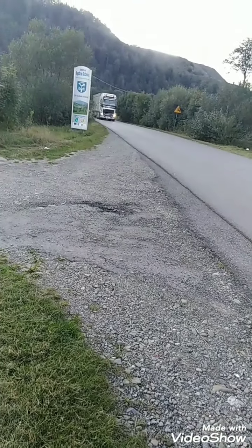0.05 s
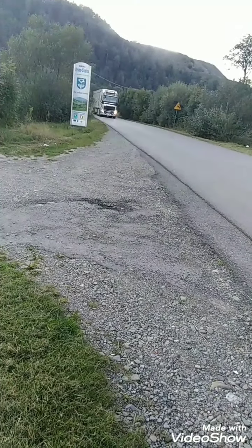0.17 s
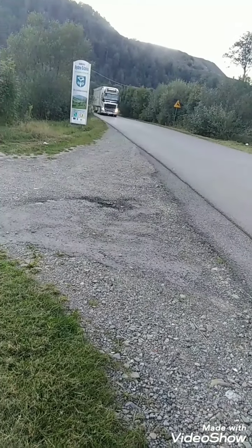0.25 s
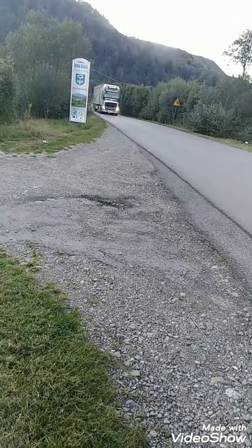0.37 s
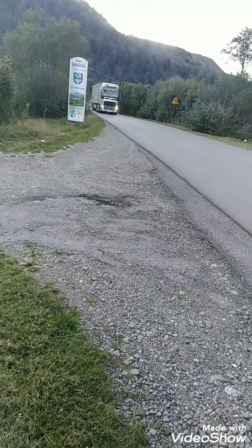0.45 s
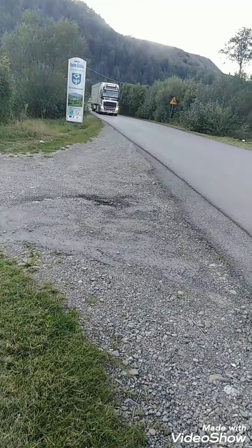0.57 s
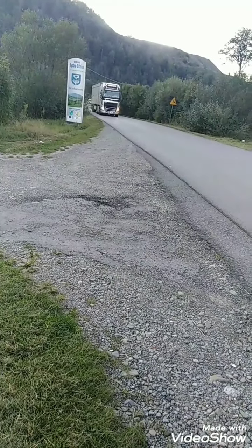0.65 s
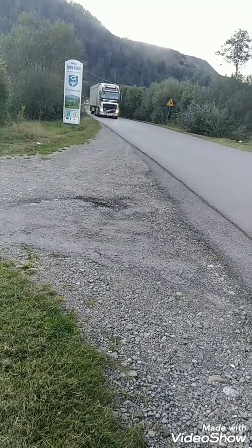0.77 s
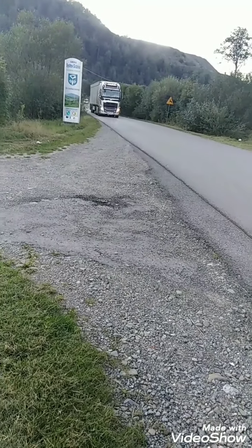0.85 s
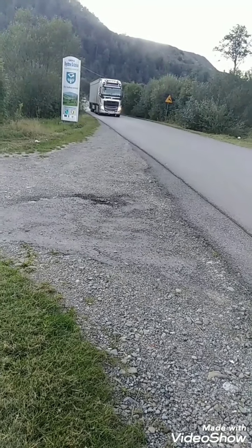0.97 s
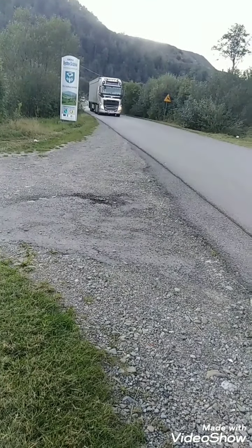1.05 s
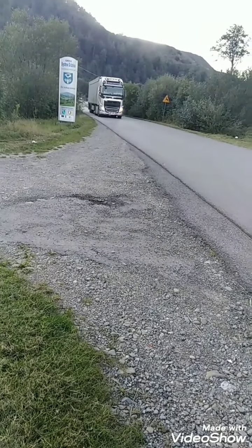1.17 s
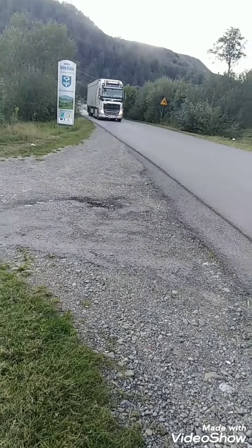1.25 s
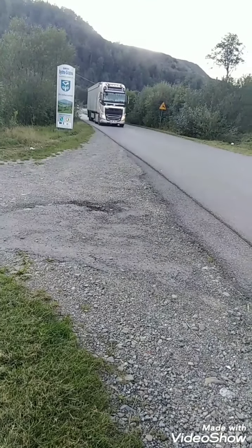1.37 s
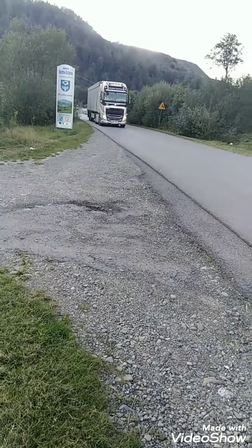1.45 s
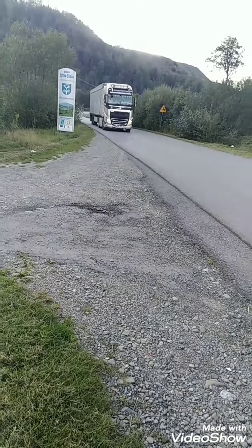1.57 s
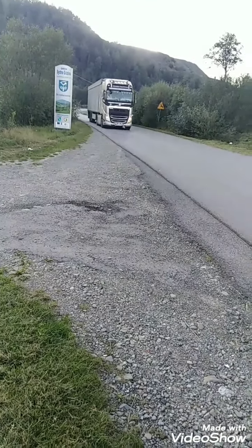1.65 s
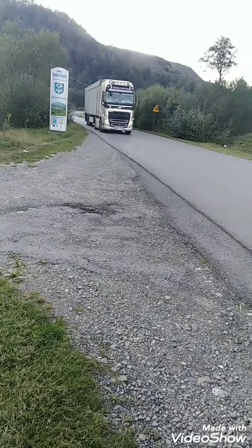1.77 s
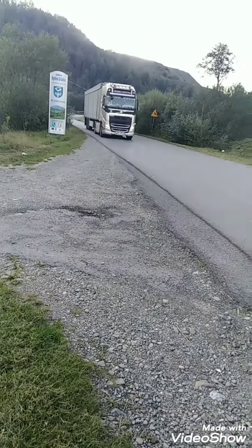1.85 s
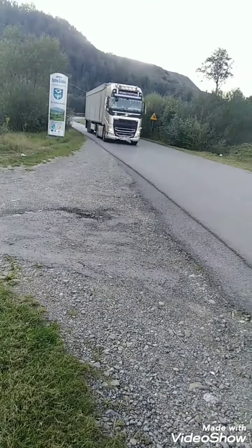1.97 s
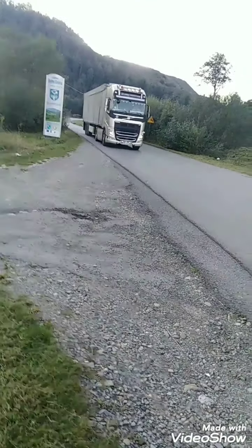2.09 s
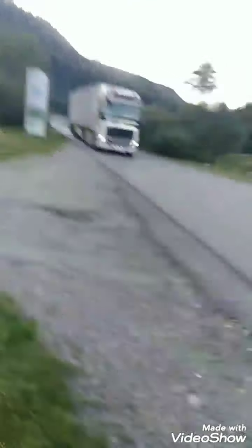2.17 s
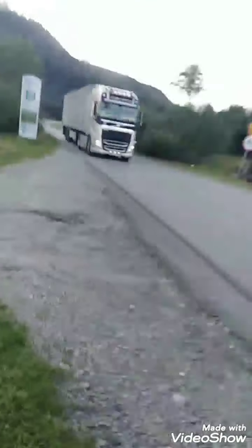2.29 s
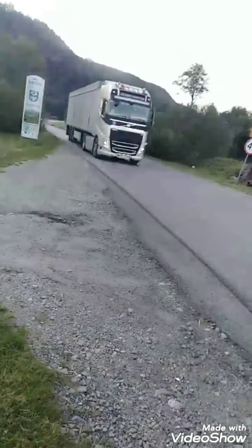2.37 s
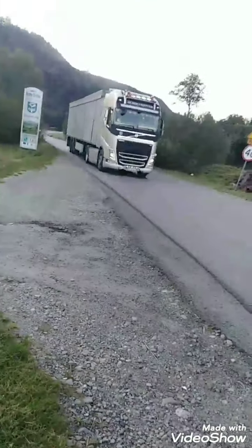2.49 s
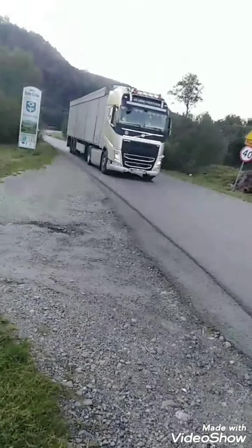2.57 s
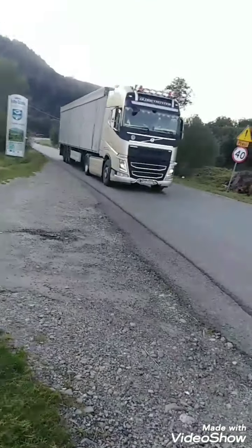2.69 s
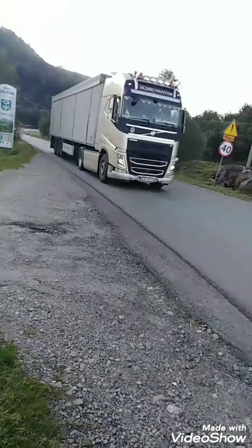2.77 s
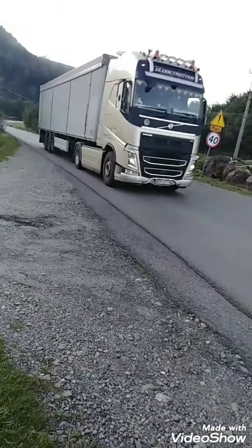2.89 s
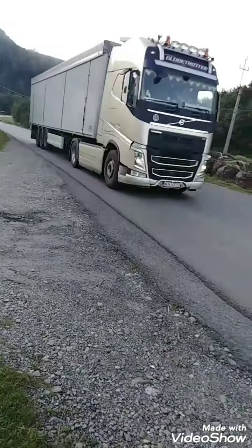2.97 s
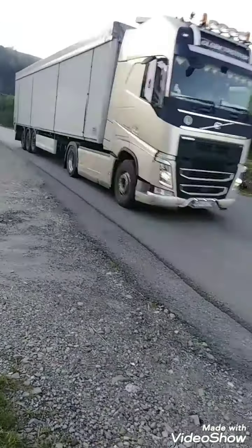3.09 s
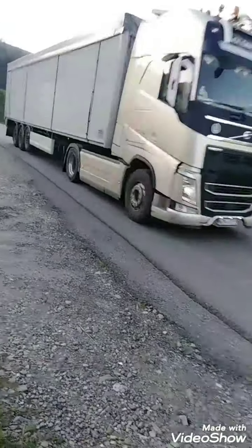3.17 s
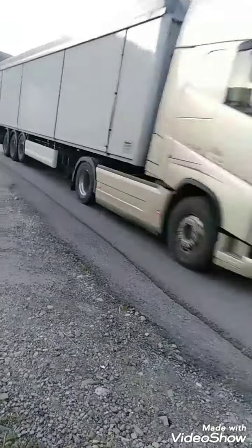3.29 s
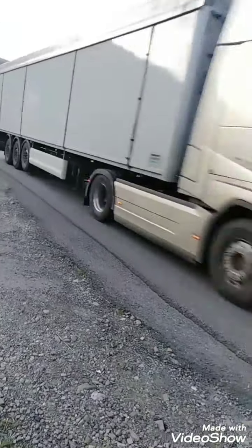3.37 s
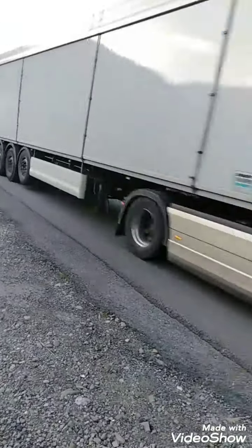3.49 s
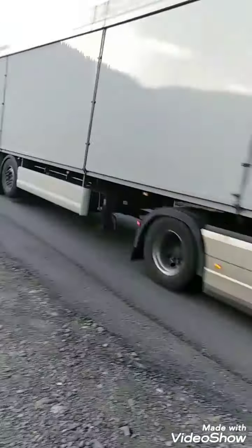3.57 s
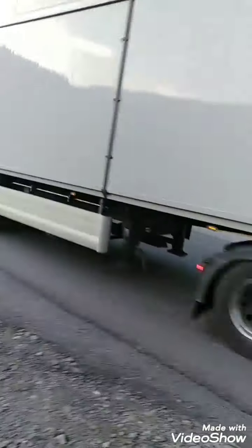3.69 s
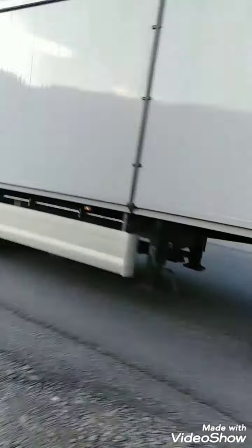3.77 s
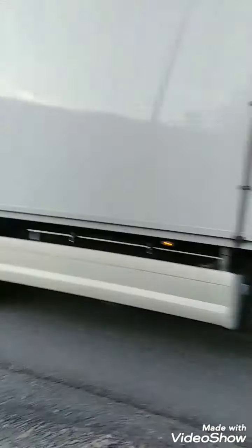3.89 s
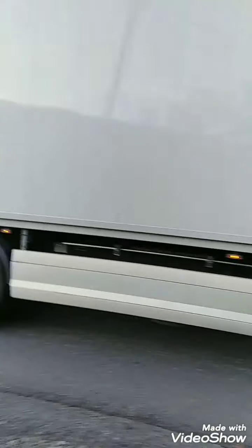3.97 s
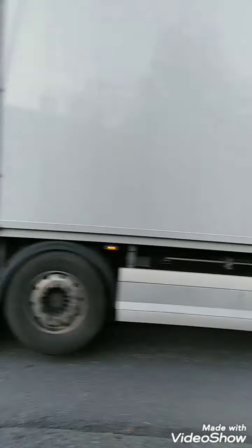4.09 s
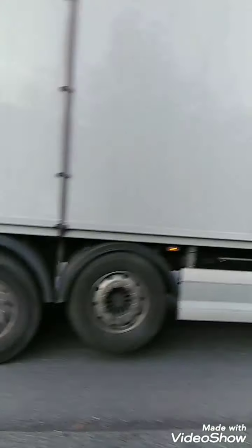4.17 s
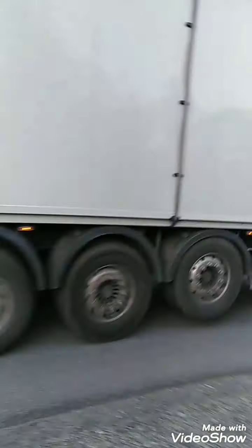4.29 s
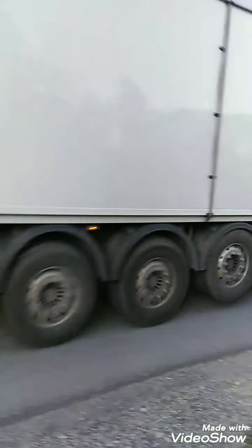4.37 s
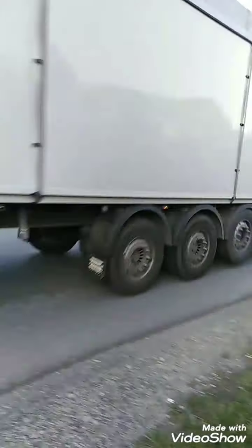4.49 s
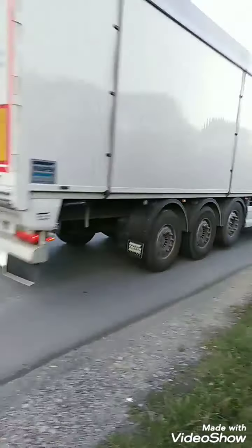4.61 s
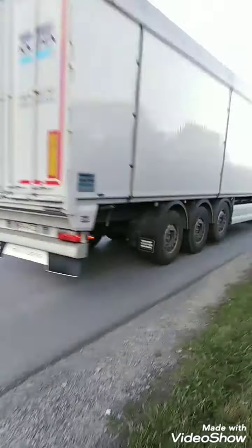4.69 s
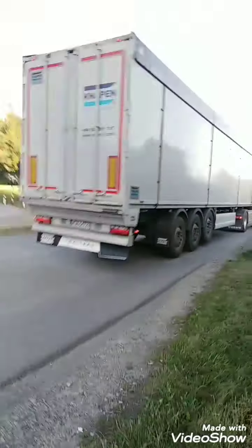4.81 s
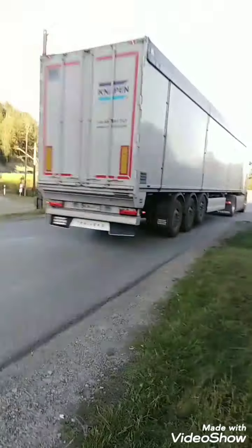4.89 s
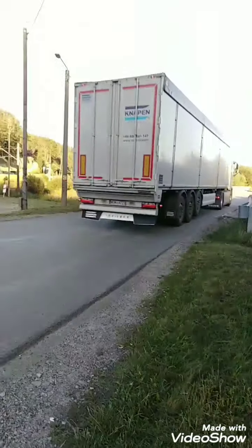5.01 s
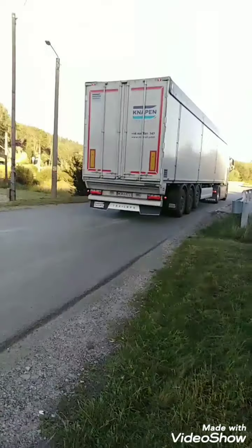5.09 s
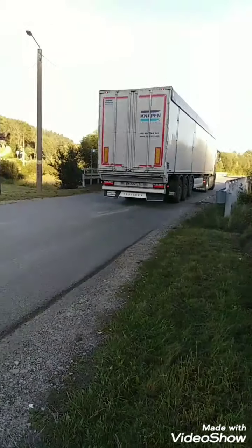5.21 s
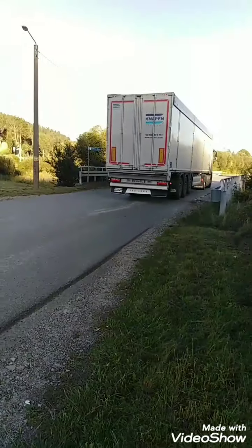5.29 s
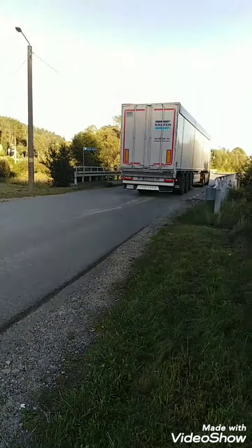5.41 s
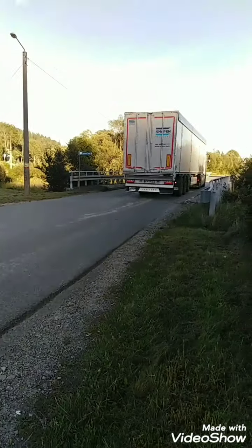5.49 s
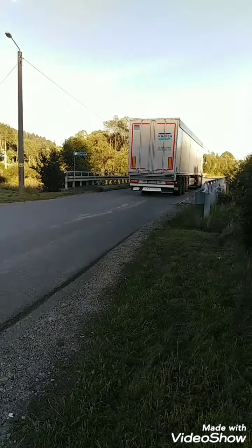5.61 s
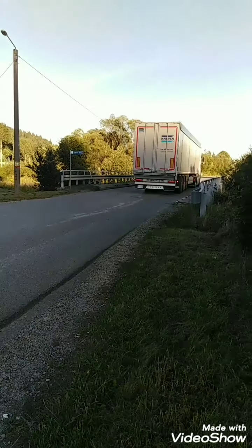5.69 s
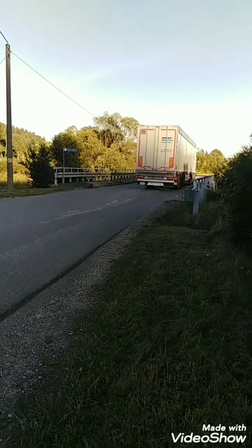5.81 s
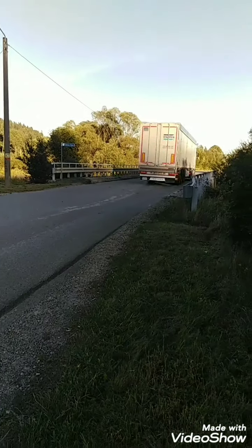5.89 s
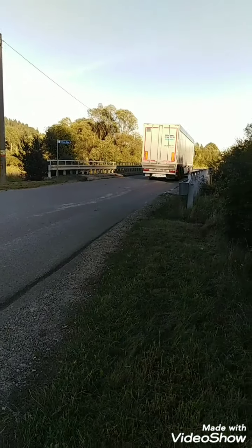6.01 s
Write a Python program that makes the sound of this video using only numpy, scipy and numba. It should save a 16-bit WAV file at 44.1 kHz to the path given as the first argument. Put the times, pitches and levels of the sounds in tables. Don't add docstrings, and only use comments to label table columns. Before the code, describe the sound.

Growing tyre roar and diesel drone, two brassy air-horn blasts, the second very loud, then a long trailer rushes past and recedes.

```python
import sys
import numpy as np
from scipy import signal
from scipy.fft import rfft, irfft, next_fast_len
from scipy.io import wavfile
from scipy.ndimage import uniform_filter1d, map_coordinates
from numba import njit

SR = 44100
rng = np.random.default_rng(int(sys.argv[2]) if len(sys.argv) > 2 else 0)


def materialize(psi):
    bounded = np.clip(np.atleast_2d(psi).T, -1, 1)
    quanta = np.round(bounded * 32767).astype(np.int16)
    wavfile.write(sys.argv[1], SR, quanta)


def voltage_ratio(decibels):
    exponent = np.asarray(decibels, float) / 20
    return 10 ** exponent


N = 266805

# time in seconds, bearing (0 coming, 1 alongside, 2 leaving).
BEARING = [
    (0, 0),
    (2.2, .1),
    (3.1, .2),
    (3.45, 1),
    (4.55, 1),
    (4.72, 1.8),
    (5.3, 2),
    (6.05, 2),
]
# time in seconds, lag in ms.
PORT_LAG = [(0, 0.18), (2, .21), (2.8, 0.16), (3.4, -0.016), (4.2, 0.013), (5, 0.049), (6.05, 0.18)]
# frequency in Hz, left minus right in dB, likeness far 0-1, likeness near 0-1.
PORTS = [(60, -1, 0.92, 0.88), (150, 4.5, 0.97, 1), (350, 0, 0.73, 0.81), (730, 1.5, 0.87, 0.75),
         (1130, -6, 0.12, 0.47), (1530, -0.5, 0.74, 0.66), (2230, -3.5, 0.91, 0.08),
         (2440, -6.5, 0.24, 0.22), (5500, -3.5, 0.18, 0.033), (8550, -14, 0.33, 0.033),
         (10200, -19.5, 0.14, 0.083), (12200, -15.5, .1, .1)]


def on_log(hz, table, col=1):
    table = np.array(table)
    return np.interp(np.log(hz), np.log(table[:, 0]), table[:, col])


def curves(table, t):
    s, *columns = np.transpose(table)
    return [np.interp(t, s, c) for c in columns]


def span(table):
    i = np.arange(int(table[0][0] * SR), int(table[-1][0] * SR))
    fade = np.clip(np.minimum(i - i[0], i[-1] - i) / (.01 * SR), 0, 1)
    return i, i / SR, fade


def walk(rate, n=N):
    k = int(SR / rate)
    held = np.repeat(rng.standard_normal(n // k + 1), k)
    return 1.85 * uniform_filter1d(uniform_filter1d(held, k), k)[:n]


def scatter(rate, n):
    return walk(rate, n) + 1j * walk(rate, n)


def rolling_bands(t):
    # time in seconds, tyre roar in dB.
    roll = [(0, -50.5), (.6, -47.5), (1.3, -44), (1.95, -40), (2.7, -34.5), (3.05, -32.5), (3.4, -27),
            (3.6, -26), (4.0, -26.5), (4.4, -27), (4.65, -29), (4.9, -32.5), (5.3, -37), (5.7, -41.5),
            (6.05, -43.5)]
    # dB over the roar coming, alongside and leaving, dB lost per dB that the roar sinks with distance.
    roll_mix = [
        (-11.5, -9.5, -12, -0.46),
        (1, -0.5, 1, 0.11),
        (-6.5, -12.5, -12, -0.097),
        (-13, -20, -18, 0.25),
    ]
    # time in seconds, width in seconds, extra hiss in dB.
    axles = [
        (3.55, 0.31, 3),
        (4.52, 0.055, 2.5),
    ]
    closest_db = -26
    roar_db, bearing = curves(roll, t)[0], curves(BEARING, t)[0]
    axle_db = sum(db * np.exp(-((t - s) / width) ** 2) for s, width, db in axles)
    bands = []
    for k, row in enumerate(roll_mix):
        over_db = np.interp(bearing, range(3), row[:3])
        distance_db = row[3] * (roar_db - closest_db)
        bands.append(roar_db + over_db + distance_db + max(k - 1, 0) * axle_db)
    return bands


def roar(band_db, flicker_db=1.61, trim_db=0):
    roll_bands = [
        (45, 230),
        (400, 2000),
        (2300, 6000),
        (6500, 13000),
    ]
    # frequency in Hz, level in dB.
    coming = [(40, -14.5), (100, -3.5), (170, -7), (250, -4), (370, -7.5), (500, 2), (800, -6),
              (1720, -6.5), (2000, -8.5), (2430, -13), (2900, -21.5), (3450, -23.5), (6500, -29),
              (14500, -35)]
    # frequency in Hz, level in dB.
    beside = [(40, -13), (100, -5.5), (250, -4.5), (400, -11), (550, -9), (750, -6), (1740, -6.5),
              (2300, -15), (3200, -13), (7400, -25), (10500, -25), (14500, -34.5)]
    # frequency in Hz, level in dB.
    leaving = [(40, -20), (80, -3.5), (190, -10.5), (330, -17.5), (560, -5.5), (750, -13), (950, -7.5),
               (1740, -6.5), (2100, -10), (3000, -12.5), (7500, -34.5), (14500, -54)]
    bearing = curves(BEARING, np.arange(N) / SR)[0]
    near = 1 - abs(bearing - 1)
    step = slice(0, N, 64)
    centres = 32 * 2 ** np.arange(0, 9, .25)
    colour = 0
    for k, table in enumerate((coming, beside, leaving)):
        share = np.clip(1 - abs(bearing[step] - k), 0, 1)
        colour = colour + np.outer(on_log(centres, table), share)
    power = voltage_ratio(2 * colour) * centres[:, None]
    lift = []
    for db, (lo, hi) in zip(band_db, roll_bands):
        inside = (centres > lo) & (centres < hi)
        lift.append(db[step] - 10 * np.log10(power[inside].sum(0)))
    place = np.interp(np.log(centres), np.log(np.prod(roll_bands, 1)) / 2, np.arange(4))
    size = next_fast_len(N)
    octave = np.log2(np.fft.rfftfreq(size, 1 / SR) + 1)
    noise = rfft(rng.standard_normal((2, size)))
    out = np.zeros((2, N))
    for hz, p, at in zip(centres, power, place):
        a = min(int(at), 2)
        db = 10 * np.log10(p) + (a + 1 - at) * lift[a] + (at - a) * lift[a + 1]
        window = np.clip(1 - 4 * abs(octave - np.log2(hz)), 0, 1)
        mid, side = irfft(noise * window, size)[:, :N]
        smooth_db = np.interp(np.arange(N), np.arange(N)[step], db)
        gain = voltage_ratio(smooth_db + 0.91 * flicker_db * walk(16) + trim_db) / np.sqrt(1.5) / mid.std()
        like = on_log(hz, PORTS, col=2) * (1 - near) + on_log(hz, PORTS, col=3) * near
        like = np.clip(like, 0, 1)
        mid, side = mid * np.sqrt(1 + like), side * np.sqrt(1 - like)
        lean = voltage_ratio(on_log(hz, PORTS) * (1 - 0.66 * near * (hz < 6000)) / 2)
        out += gain * np.array([lean * (mid + side), (mid - side) / lean]) / (lean + 1 / lean)
    return 2 * out


def roar_dips(x):
    # frequency in Hz, width in Hz, depth 0-1, how soon it fills (power of the distance).
    narrow_dips = [(405, 160, .42, .2), (1930, 260, .9, 6), (2780, 240, .78, 6)]
    leaving_fill = .1
    side = curves(BEARING, np.arange(N) / SR)[0] - 1
    far = abs(side) * (1 - leaving_fill * (side > 0))
    for hz, width_hz, depth, soon in narrow_dips * 2:
        peak = signal.lfilter(*signal.iirpeak(hz, hz / width_hz, fs=SR), x)
        x = x - np.clip(depth, 0, 1) * far ** soon * peak
    return x


def diesel(rumble_db, wobble=.0012, scatter_db=1.3):
    # multiple of the firing rate, level in dB over the rumble.
    drone = [
        (1, -8),
        (2, 2),
        (3.32, -9),
        (6.65, -13),
    ]
    # multiple of the firing rate, level in dB over the rumble.
    throb = (2 / 3, -4)
    firing_hz, doppler_swing, pass_s, pass_width_s = 80.95, 0.036, 3.4, 0.413
    leaving_db = -8
    t = np.arange(N) / SR
    hz = firing_hz * (1 - doppler_swing * np.tanh((t - pass_s) / pass_width_s))
    turn = 2 * np.pi * np.cumsum(hz * (1 + wobble * walk(9.9))) / SR
    steady_db = uniform_filter1d(rumble_db + leaving_db * (t > pass_s), SR // 2)
    near = 1 - abs(curves(BEARING, t)[0] - 1)
    out = near * voltage_ratio(rumble_db + throb[1]) * np.sin(throb[0] * turn)
    for m, db in drone:
        out = out + voltage_ratio(steady_db + db + scatter_db * walk(12.0)) * np.sin(m * turn)
    return out


def grit(spray_db, ring_ms=3.6, left_db=-6, sand_per_s=60, sand_db=0, sand_spread_db=3):
    # time in seconds, peak in dB, ring in Hz.
    stones = [(0.5377, -50, 5160), (1.2794, -39, 4510), (4.3494, -28, 5030), (4.4433, -26, 4640),
              (4.482, -17, 4360), (4.5094, -22, 4840), (4.529, -21, 4700), (4.566, -26, 4630),
              (4.589, -26, 4560), (4.9003, -28, 5640), (4.9494, -32, 5860), (5.1594, -47, 5190),
              (5.2294, -47, 5500), (5.3168, -39, 4600), (5.3617, -51, 4790), (5.4794, -48, 5550)]
    sand_s, size = rng.uniform(0, N / SR, 2000), rng.exponential(1, 2000)
    sand = [(a, spray_db[int(a * SR)] + sand_db + sand_spread_db * b, 9000) for a, b in zip(sand_s, size)]
    sand = sand[:int(sand_per_s * N / SR)]
    out, t = np.zeros(N + 600), np.arange(600) / SR
    for s, db, hz in [*stones, *sand]:
        hiss = np.convolve(rng.standard_normal(602), [1, 0, -1], "valid")
        tick = .3 * np.sin(2 * np.pi * hz * t) + .4 * hiss
        out[int(s * SR):][:600] += voltage_ratio(db) * np.exp(-t * 1000 / ring_ms) * tick
    return np.outer(voltage_ratio(np.array([left_db, 2])), out[:N])


def horn(spread=.32, spread_hz=3.5, own=.42, rasp_hz=220, side_db=-5, port_share=.1, body_hz=2200, edge_hz=3800):
    # time in seconds, fundamental in dB, drive in dB (air on the reeds, as level of the top partials).
    blasts = [
        [(1.985, -78, -100), (2.012, -31, -31.5), (2.05, -36, -25.5), (2.22, -46.5, -21.5), (2.33, -32, -22.5),
         (2.46, -34, -22.5), (2.5, -28, -38), (2.57, -36.5, -53), (2.64, -48, -80)],
        [(3.075, -58, -88), (3.098, -16.5, -39), (3.125, -24, -23.5), (3.155, -11.5, -19), (3.2, -13, -32),
         (3.26, -10, -57.5), (3.34, -20.5, -90), (3.43, -31.5, -90), (3.46, -36, -95)],
    ]
    # time in seconds, first trumpet in Hz, share of the second 0-1.
    reeds = [
        [(1.98, 277, .4), (2.02, 273, .45), (2.06, 270, .25), (2.17, 271.5, .2), (2.24, 270, .1),
         (2.36, 272.3, .13), (2.5, 272, .1), (2.56, 269, .4), (2.64, 268, .5)],
        [(3.07, 270, .9), (3.13, 270, .85), (3.155, 270, .45), (3.18, 270, .08), (3.21, 270.8, .03),
         (3.26, 268.7, .1), (3.35, 267, .2), (3.46, 265, .3)],
    ]
    flat_by_blast = [2.6, 5.2]
    # frequency in Hz, level in dB.
    bell_colour = [(1000, 2), (1350, 4), (1650, 3.5), (2100, 2.5), (2700, 4.5), (3500, 1.5), (4800, -5),
                   (7500, -8.5), (9500, -7.5), (11000, -15.5), (14200, -21)]
    low_partials = [(2, 0.47), (3, .3), (4, 0.31)]
    # level in dB, extra dB as the reeds catch, fades per second, second of a cancelled moment.
    road_fades = [
        [(-8, 9, 5.68, 2.145), (-9, 9, 6.22, 2.065), (-8.5, 2, 9.64, 2.25)],
        [(-10, 13, 4.5, 3.158), (-3, -6, 9.5, 3.19), (-8, 0, 6.4, 3.148)],
    ]
    off_axis = [-0.5, -7.5]
    # time in seconds, width in seconds, dB off the top partials.
    valve_slip = (2.352, 0.029, -10.5)
    slip_s, slip_width_s, slip_db = valve_slip
    off_axis_hz = 2470
    full_drive_db, body_at_full_db, body_per_drive = -21, -13.5, 0.38
    ring_off = .33
    catch_s, flutter, fade_depth = 0.045, 0.3, .85
    left_per_db, even_at_db = 0.3555, -2.5
    rasp_base, rasp_fight = .18, 1.6
    out = np.zeros((2, N))
    for blast, reed, flat_hz, fades, shade_db in zip(blasts, reeds, flat_by_blast, road_fades, off_axis):
        i, t, fade = span(blast)
        n = len(i)
        first_db, edge_db = curves(blast, t)
        body_db = body_at_full_db + body_per_drive * (edge_db - full_drive_db)
        edge_db = edge_db + slip_db * np.exp(-((t - slip_s) / slip_width_s) ** 2)
        pan_db = left_per_db * (even_at_db - first_db)
        one_hz, share = curves(reed, t)
        two_hz = one_hz - flat_hz
        rasp = rasp_base + rasp_fight * share * (1 - share)
        hz = one_hz + share * (two_hz - one_hz)
        turn, one, two = 2 * np.pi * np.cumsum([hz, one_hz, two_hz], axis=1) / SR
        late = 2 * np.pi * hz * curves(PORT_LAG, t)[0] / 1000
        tone = voltage_ratio(first_db + np.outer([.5, -.5], pan_db)) * np.sin(turn)
        for (m, low), (db, catch_db, per_s, null_s) in zip(low_partials, fades):
            m = round(m)
            catch = catch_db * np.exp(-((t - t[0]) / catch_s) ** 2)
            db = db + low * first_db + (1 - low) * body_db + catch
            rays = 1 - fade_depth * np.exp(2j * np.pi * per_s * (t - null_s))
            rays = rays * (1 + flutter * scatter(24.9, n))
            apart = voltage_ratio(side_db) * np.outer([1, -1], scatter(spread_hz * m, n))
            tone += voltage_ratio(db) * ((1 + apart) * rays * np.exp(1j * m * turn)).imag
        body_db = body_db + ring_off * np.minimum(edge_db - full_drive_db - slip_db, 0)
        k = np.arange(5, 53)
        partial_hz = k * hz.mean()
        bell = voltage_ratio(on_log(partial_hz, bell_colour))
        body = np.linalg.norm(bell[partial_hz < body_hz])
        edge = np.linalg.norm(bell[partial_hz > edge_hz])
        for m, f, size in zip(k, partial_hz, bell):
            high = np.clip(np.log(f / body_hz) / np.log(edge_hz / body_hz), 0, 1)
            shade = voltage_ratio(shade_db * np.exp(-(np.log2(f / off_axis_hz) / 0.31) ** 2))
            level = size * shade * (voltage_ratio(body_db) / body) ** (1 - high) * (voltage_ratio(edge_db) / edge) ** high
            second = np.exp(1j * (m * two + rng.uniform(0, 2 * np.pi)))
            pair = np.sqrt(1 - share) * np.exp(1j * m * one) + np.sqrt(share) * second
            paths = np.exp(1j * rng.uniform(0, 2 * np.pi)) + spread * scatter(spread_hz * m, n)
            for side, sign in enumerate((1, -1)):
                rough = rasp * (.32 + .15 * high) * scatter(rasp_hz, n)
                heard = paths + own * scatter(spread_hz * m, n) + rough
                lean = voltage_ratio(sign * port_share * (0.5 + 2 * high) * on_log(f, PORTS))
                lean = lean * np.exp(-.5j * sign * m * late)
                tone[side] += level * (heard * lean * pair).imag / np.sqrt(1 + 2 * (spread ** 2 + own ** 2))
        out[:, i] += np.sqrt(2) * fade * tone
    return out


@njit
def valley(x, lags, gain, damp):
    line, soft, out = np.zeros((8, 8192)), np.zeros(8), np.zeros((2, len(x)))
    for i in range(len(x)):
        total = 0.
        for k in range(8):
            soft[k] += (1 - damp) * (gain[k] * line[k, (i - lags[k]) & 8191] - soft[k])
            total += soft[k]
            out[k % 2, i] += soft[k]
        for k in range(8):
            line[k, i & 8191] = x[i] + soft[k] - total / 4
    return out


def slope_echo(flutter_db=1.6, drift=0.4):
    # time in seconds, level in dB.
    slope = [(3.46, -46), (3.58, -27.5), (3.66, -50), (3.85, -30.5), (4.1, -29.5), (4.27, -29.5),
             (4.55, -37.5)]
    # time in seconds, pitch in Hz.
    slope_hz = [(3.46, 266), (3.64, 266), (3.72, 257), (4.1, 251), (4.55, 246)]
    # multiple, level in dB.
    slope_partials = [(1, 0.5), (2, -6.5), (3, -12), (4, -17)]
    out = np.zeros(N)
    i, t, fade = span(slope)
    turn = 2 * np.pi * np.cumsum(curves(slope_hz, t)[0]) / SR
    for m, db in slope_partials:
        size = voltage_ratio(curves(slope, t)[0] + db + flutter_db * walk(14.2, len(i)))
        out[i] += fade * size * np.sin(m * turn + drift * walk(12.45, len(i)))
    return out


def tread(width_hz=110, swish_hz=3200, swish_width_hz=600):
    # time in seconds, pitch in Hz, hum in dB, swish in dB.
    singing = [
        (4.45, 860, -49, -61),
        (4.65, 764, -40.5, -59),
        (4.8, 687, -37, -44.5),
        (4.95, 653, -47, -49),
        (5.15, 580, -57, -60),
    ]
    out = np.zeros(N)
    i, t, fade = span(singing)
    hz, hum_db, swish_db = curves(singing, t)
    hum = scatter(width_hz, len(i)) * np.exp(2j * np.pi * np.cumsum(hz) / SR)
    swish = scatter(swish_width_hz, len(i)) * np.exp(2j * np.pi * swish_hz * t)
    out[i] = fade * (voltage_ratio(hum_db) * hum + voltage_ratio(swish_db) * swish).imag
    return out


def scene():
    valley_t60_s, valley_damp, valley_db = 1.4, .75, -20
    duck_from_db, duck_slope = -25, .43
    t = np.arange(N) / SR
    band_db = rolling_bands(t)
    rolling = roar_dips(roar(band_db)) + diesel(band_db[0]) + grit(band_db[3]) + tread()
    late = curves(PORT_LAG, t)[0] * SR / 1000
    rolling[0] = map_coordinates(rolling[0], [np.arange(N) - late], order=3, mode="nearest")
    blast = horn()
    lags = rng.integers(2500, 8000, 8)
    returns = valley(blast[1] + 1e-18, lags, voltage_ratio(-60 * lags / SR / valley_t60_s), valley_damp)
    loud_db = 10 * np.log10(uniform_filter1d((blast ** 2).mean(0), int(0.014 * SR)).clip(1e-12))
    duck = voltage_ratio(-duck_slope * np.clip(loud_db - duck_from_db, 0, None))
    return blast + voltage_ratio(valley_db) * returns + duck * rolling + slope_echo()


def roll_off(x):
    return signal.sosfilt(signal.butter(12, 14500, fs=SR, output="sos"), x)


def record(dry):
    mic_low_hz, mic_top_hz, mic_bend = 47, 14200, .22
    low_cut = signal.butter(6, mic_low_hz, "high", fs=SR, output="sos")
    top_cut = signal.ellip(8, .2, 60, mic_top_hz, fs=SR, output="sos")
    clean = signal.sosfilt(np.vstack([low_cut, top_cut]), dry)
    difference_band = signal.butter(2, (50, 200), "band", fs=SR, output="sos")
    bend = signal.sosfilt(difference_band, clean ** 2)
    return roll_off(np.tanh(clean - mic_bend * bend))


dry = scene()
out = record(dry)
materialize(out)
```